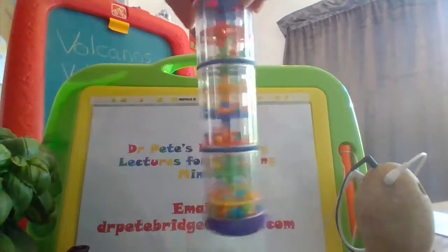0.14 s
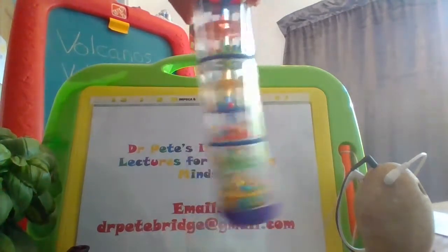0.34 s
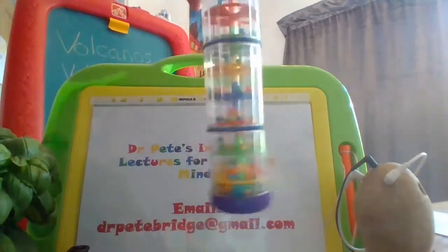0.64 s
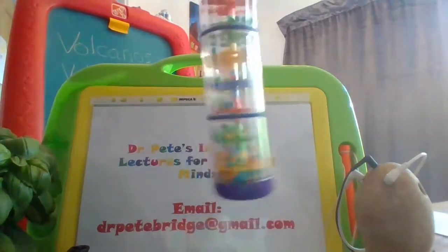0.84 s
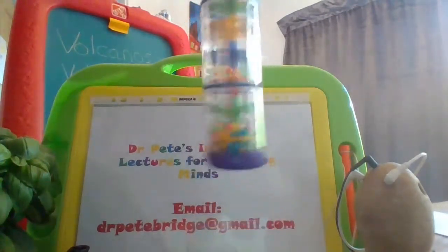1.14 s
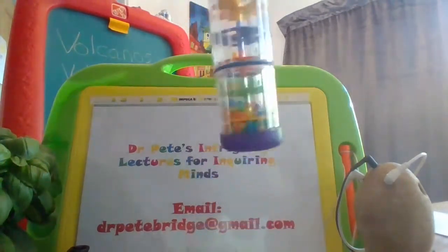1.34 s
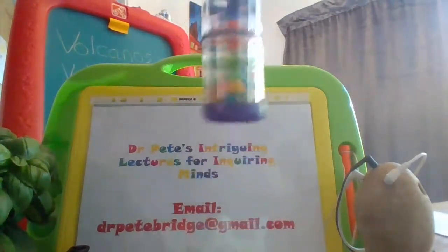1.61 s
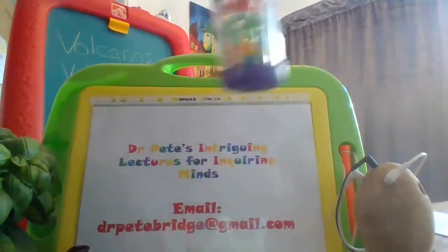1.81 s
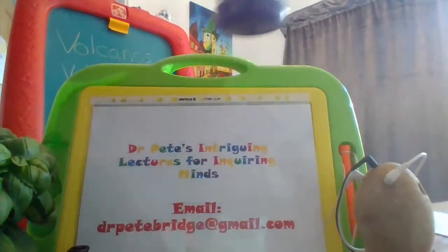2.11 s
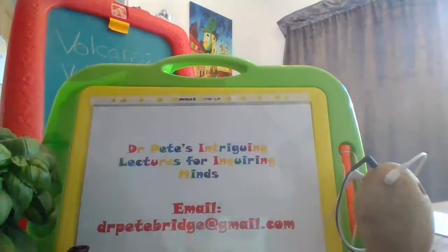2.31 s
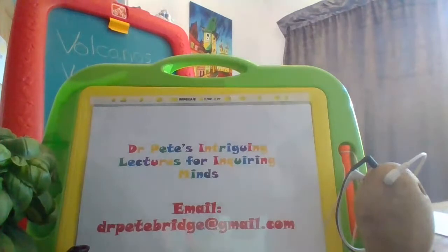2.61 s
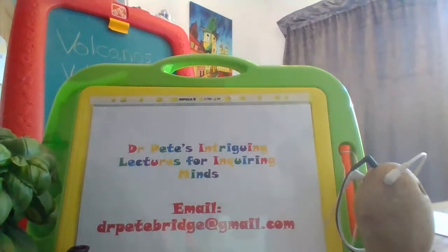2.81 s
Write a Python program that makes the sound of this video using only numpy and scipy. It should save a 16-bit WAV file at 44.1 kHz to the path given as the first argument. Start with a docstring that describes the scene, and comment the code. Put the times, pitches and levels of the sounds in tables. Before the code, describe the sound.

Small hard beads trickle through a plastic rainmaker tube, a bright, dense, jittery hissing rattle

```python
"""Beads trickling in a tube

Small hard beads trickle over the baffles of a clear plastic tube in a quiet room. A hand jiggles it about
twelve times a second and slowly lifts it away from a mono microphone. Random ticks ring the modes of the tube,
dry clicks fill in between, and the hardest ticks are a crack plus one short pitch. A short room echo, faint
low noise and soft bumps lie underneath; a few times the sound drops out for some milliseconds, leaving hiss."""
import sys
import numpy as np
from scipy import signal
from scipy.fft import rfft, irfft, next_fast_len
from scipy.io import wavfile
from scipy.ndimage import uniform_filter1d, map_coordinates

SR = 44100
rng = np.random.default_rng(int(sys.argv[2]) if len(sys.argv) > 2 else 0)


def generate_wav(sig):
    """Save sig (samples, or channels by samples) to the path in sys.argv[1] as 16-bit PCM at SR."""
    pcm = np.round(np.clip(np.atleast_2d(sig).T, -1, 1) * 32767).astype(np.int16)
    wavfile.write(sys.argv[1], SR, pcm)


N = 130095
T = np.arange(N) / SR  # time of each sample in seconds


def amp(db):
    """Turn decibels into a plain multiplier."""
    return 10 ** (np.asarray(db) / 20)


def unit(x):
    """Scale a sound to an average (rms) level of 1."""
    return x / np.sqrt(np.mean(x ** 2) + 1e-20)


def filtered(x, response):
    """Multiply the spectrum of x by a response that depends on frequency."""
    padded = 2 * next_fast_len(N // 2 + 4096)  # spare room for the filter's ringing
    hz = np.fft.rfftfreq(padded, 1 / SR)
    return irfft(rfft(x, padded) * response(hz), padded)[..., :N]


def coloured(x, points):
    """Shape the tone by a curve of (pitch_hz, level_db) points; the filter rings only after its input."""
    point_hz, point_db = np.transpose(points)

    def response(hz):
        curve_db = np.interp(np.log(hz + 1), np.log(point_hz + 1), point_db)
        cepstrum = irfft(np.log(amp(curve_db)))
        k = np.arange(len(cepstrum))
        # Folding the second half onto the first gives the minimum-phase filter.
        fold = ((k > 0) + 1) * (k < len(cepstrum) / 2)
        return np.exp(rfft(cepstrum * fold))
    return filtered(x, response)


def resonant(x, hz, width_hz):
    """Pass x through one resonance, which leaves its centre pitch at full level."""
    return filtered(x, lambda f: 1j * f * width_hz / (hz * hz - f * f + 1j * f * width_hz))


def wobble(rate):
    """A smooth random curve through a given number of random points a second."""
    return map_coordinates(rng.standard_normal(400), [T * rate])


def bump(s, spread_s, rise=1):
    """A bell curve around a moment; rise below 1 makes it rise faster than it falls."""
    side_s = np.where(T < s, rise * spread_s, spread_s)
    return np.exp(-.5 * ((T - s) / side_s) ** 2)


def patchy(x, depth_db, top_hz):
    """Make the sound below about top_hz come and go in random patches of time and pitch."""
    hz, _, z = signal.stft(x, SR, nperseg=2048, noverlap=1536)
    field = uniform_filter1d(rng.standard_normal(z.shape), size=4, axis=0)
    field = unit(uniform_filter1d(field, size=4, axis=1))
    gain_db = depth_db * field / (1 + (hz[:, None] / top_hz) ** 6)
    return signal.istft(z * amp(gain_db), SR, nperseg=2048, noverlap=1536)[1][:N]


def impacts(rate, size_db):
    """Beads hit at random times, with random sizes and signs; the average (rms) level is 1."""
    when, size, sign = rng.random(N), rng.standard_normal(N), rng.standard_normal(N)
    hits = (when < rate / SR) * amp(size_db * np.clip(size, -3, 2.5)) * np.sign(sign)
    return unit(hits)


# Modes of the tube: pitch_hz, width_hz, near_db (before the lift), lifted_db (after it).
# The levels are relative, before the overall colouring.
TUBE_MODES = [(1265, 262, 3, 2), (2173, 256, 3.5, 1), (3180, 290, 2.5, -9.5), (4000, 250, -1, 4),
              (4360, 360, -0.5, 0.5), (4860, 470, -10, 5), (5750, 250, -10, 1), (6630, 370, 0, -0.5),
              (7200, 490, 1, 1), (9580, 130, -5, 2), (10450, 390, -2, -2), (11400, 220, -10, 3.5)]
# Jiggles of the hand: start_s (middle of the swell), swell_db, lowest_mode_db (extra swell of the lowest mode).
JIGGLES = [(.045, 1, 4), (0.123, 4, -3), (0.183, 4.5, -6), (0.213, 4, -9), (0.278, 5, -6.5),
           (.31, 2.5, 2.5), (0.365, 3, 0), (.44, 2, -5), (.466, 1, 1), (0.545, 5, -33), (0.622, 3, -5),
           (0.689, 2, -2.5), (0.769, 3.5, 2), (0.845, 4, -2), (0.889, 3.5, -6), (0.943, 5, -8),
           (1.02, 2.5, -15), (1.098, 1.5, -4), (1.182, 1.5, -15), (1.272, 0.5, -5), (1.337, 1, 0),
           (1.427, 2.5, 4), (1.499, 2.5, -11), (1.583, 4.5, -17), (1.656, 3, 3), (1.736, 2, 3),
           (1.801, 2, 2), (1.91, 1.5, 4.5), (1.98, 0, 5.5), (2.055, 1.5, 1.5), (2.135, 1.5, -10.5),
           (2.105, -1.5, 17.5), (2.2, 1, 6), (2.26, 0, 11), (2.38, 1.5, 8), (2.454, 2, 0), (2.534, 0, 5),
           (2.62, -0.5, -11), (2.699, 1.5, 2), (2.783, 3, -13), (2.855, 1.5, 6)]
# Overall colour before the lift: pitch_hz, level_db (per Hz).
NEAR_COLOUR = [(240, -66.5), (400, -33), (700, -18.5), (1050, -10.5), (1270, -3), (1770, -10), (2270, -5.5),
               (3280, -6.5), (3590, -7), (4260, -2), (5040, -5), (6750, -2.5), (7990, -6.5), (10400, -1),
               (15700, -4.5)]
# Overall colour after the lift: pitch_hz, level_db (per Hz).
LIFTED_COLOUR = [(240, -69), (400, -61), (739, -22.5), (1250, -9.5), (1830, -17.5), (2300, -1),
                 (3180, -3.5), (3380, -4), (4670, -3.5), (5280, -4.5), (6640, -1), (7870, -5),
                 (10700, -2.5), (15700, -6.5)]
# Gain of the gap between the two lowest modes, showing how hollow it sounds: time_s, gain_db.
HOLLOW = [(0, -2), (.8, -1), (1.3, 1.5), (1.43, -7), (1.51, 4), (1.58, -1), (1.65, 2.5), (2.2, -2.5),
          (2.53, 2.5), (2.6, -5), (2.66, 2), (2.71, 5), (2.9, -1)]
# Strength of the trickle before the swells and a final trim: time_s, level_db.
FLOW = [(0.0, -48.5), (0.024, -43.5), (0.031, -32), (0.045, -34), (0.09, -32.5), (0.11, -29.5),
        (0.48, -23.5), (0.51, -26), (0.55, -26.5), (0.6, -26), (0.62, -26), (1.16, -28.5), (2.07, -29.5),
        (2.25, -33.5), (2.88, -32), (2.95, -35.5)]
LIFT_START_S, LIFT_END_S = 0.56, 2.43
CLICKS_PER_S, CLICK_SIZE_DB, CLICK_DB = 12000, 3.5, -1  # dry bead-on-bead clicks: rate, size scatter, level
TICKS_PER_S, TICK_SIZE_DB = 500, 4  # ticks on each pitch, size scatter
DETUNE = 0.014  # baffles differ: each mode sounds at two pitches, this share below and above its centre
DRIFT_DB, DRIFT_PER_S = 1.8, 25  # random wander in level of each pitch
CLUMP_DB, CLUMPS_PER_S = .8, 130  # beads arrive in small clumps
JIGGLE_S, RISE_SHARE = 0.015, 0.89  # spread of a swell as it falls, its rise over its fall
HOLLOW_HZ, HOLLOW_WIDTH_HZ = 1820, 520


def beads():
    """Ticks ring the modes, clicks stay dry; jiggles swell them and the lift changes their colour."""
    lift = np.clip((T - LIFT_START_S) / (LIFT_END_S - LIFT_START_S), 0, 1)
    lowest_mode_db = sum(db * bump(s, 1.43 * JIGGLE_S) for s, _, db in JIGGLES)
    x = amp(CLICK_DB) * impacts(CLICKS_PER_S, CLICK_SIZE_DB)
    for k, (hz, width_hz, near_db, lifted_db) in enumerate(TUBE_MODES):
        for side in (-1, 1):
            gain_db = near_db + lift * (lifted_db - near_db) + DRIFT_DB * wobble(DRIFT_PER_S)
            if k == 0:
                gain_db = gain_db + lowest_mode_db
            ticks = amp(gain_db) * impacts(TICKS_PER_S, TICK_SIZE_DB) / np.sqrt(2)
            x = x + resonant(ticks, hz * (1 + side * DETUNE), width_hz)

    # Fade from the near colour to the lifted one.
    x = (1 - lift) * unit(coloured(x, NEAR_COLOUR)) + lift * unit(coloured(x, LIFTED_COLOUR))
    hollow_gain = amp(np.interp(T, *np.transpose(HOLLOW)))
    x = x + (hollow_gain - 1) * resonant(x, HOLLOW_HZ, HOLLOW_WIDTH_HZ)

    jiggle_db = sum(db * bump(s, JIGGLE_S, rise=RISE_SHARE) for s, db, _ in JIGGLES)
    swell_db = CLUMP_DB * wobble(CLUMPS_PER_S) + jiggle_db
    flow_db = np.interp(T, *np.transpose(FLOW))
    return x * amp(flow_db + swell_db - 2.0)  # trimmed by 2 dB


# The hardest ticks, each ringing clear of the rattle: start_s, pitch_hz, level_db (start of the ring, uncoloured).
HARD_TICKS = [(.028, 1280, -39), (.117, 10780, -23), (.127, 4310, -25), (.178, 7400, -20),
              (.184, 7240, -17), (.212, 10470, -17), (.226, 7040, -22), (.279, 6500, -32),
              (.297, 10300, -21), (.363, 6840, -19), (0.371, 6800, -20), (.393, 4320, -28),
              (.449, 4130, -18), (.464, 10470, -21), (0.537, 6760, -24), (.549, 10700, -24),
              (.559, 3160, -18.5), (.625, 6770, -21), (.769, 3970, -22), (.77, 10610, -21),
              (.848, 4420, -19), (.888, 6840, -24), (.937, 10400, -19), (0.943, 10470, -17),
              (1.182, 6750, -24), (1.257, 10460, -22.5), (1.324, 7050, -21), (1.587, 4640, -24),
              (1.669, 4400, -22), (1.886, 6830, -23), (1.91, 4500, -19), (2.134, 11510, -25),
              (2.261, 5000, -31), (2.335, 5400, -27), (2.684, 2200, -24), (2.692, 2300, -31),
              (2.887, 2400, -29.5), (2.908, 4970, -28)]
RING_T60_S, CRACK_T60_S, CRACK_DB = 0.013, 0.0022, -10  # times to fall 60 dB, crack level against the ring


def hard_ticks():
    """A hard hit gives a short noisy crack and one pitch that dies fast."""
    out, t = np.zeros(N + SR), T[:SR // 20]
    for s, hz, db in HARD_TICKS:
        crack = amp(CRACK_DB - 60 * t / CRACK_T60_S) * rng.standard_normal(len(t))
        ring = amp(-60 * t / RING_T60_S) * np.sin(2 * np.pi * hz * t)
        out[round(s * SR):][:len(t)] += amp(db) * (ring + crack)
    # Thin out the lows.
    return coloured(out[:N], [(240, -66), (400, -30), (1100, -4.5), (16000, -0.5)])


ROOM_T60_S, ROOM_DB = 0.081, -5.5  # time for the echo to fall 60 dB, its level


def room(x):
    """A short diffuse echo of fading noise, blended into a new one every eighth of a second as the tube moves."""
    step, t = SR // 8, T[:SR // 3]
    wet, fade = np.zeros(N + 2 * SR), np.hanning(2 * step)
    x = np.pad(x, (step, 2 * step))
    for at in range(0, N + step, step):
        tail = rng.standard_normal(len(t)) * amp(-60 * t / ROOM_T60_S)
        part = signal.fftconvolve(fade * x[at:at + 2 * step], tail / np.linalg.norm(tail))
        wet[at:at + len(part)] += part
    return wet[step:step + N]


# Colour of the low room noise: pitch_hz, level_db (per Hz).
FLOOR_COLOUR = [(15, -50), (25, -27), (53, -11), (81, 2), (249, -1.5), (339, -3.5), (600, -9.5), (780, -49),
                (1320, -120)]
# Soft low bumps: start_s (middle of the bump), level_db (peak of its bell curve).
THUDS = [(.4, -72), (.66, -72), (1.82, -74), (2.48, -77), (2.55, -62), (2.64, -69)]
FLOOR_DB = -79  # level of the room noise before its patches
THUD_HZ, THUD_S = 137, 0.014  # pitch and spread of a bump
FLOOR_PATCH_DB, SKIRT_PATCH_DB, SKIRT_HZ = 4.5, 4.5, 990  # patches in the room noise and in the beads' faint lows


def background():
    """Faint low noise shaped from random hiss, and soft bumps made from a briefly swelling low tone."""
    noise = unit(coloured(rng.standard_normal(N), FLOOR_COLOUR))
    noise = amp(FLOOR_DB) * patchy(noise, FLOOR_PATCH_DB, SKIRT_HZ)
    thud_level = sum(amp(db) * bump(s, THUD_S) for s, db in THUDS)
    return noise + thud_level * np.sin(2 * np.pi * THUD_HZ * T)


def scene():
    """Beads and hard ticks with their room echo, over the background; both channels are the same."""
    x = beads() + hard_ticks()
    x = x + amp(ROOM_DB) * room(x)
    x = patchy(x, SKIRT_PATCH_DB, SKIRT_HZ) + background()
    return np.array([x, x])


# Dropouts: centre_s, half_length_s, depth_db, hiss_db (level of the flat hiss that fills them).
DROPOUTS = [(0.51, 0.012, -9, -40.5), (0.593, 0.0094, -8.5, -47.5), (2.286, 0.0096, -10, -46),
            (2.945, 0.013, -3.5, -49.5)]
# Colour of that hiss: pitch_hz, level_db (per Hz).
HISS_COLOUR = [(30, -7), (100, -7.5), (200, -2), (480, 0), (700, -1.5), (2000, 2.5), (15000, -4)]
TOP_HZ = 15720  # almost nothing passes above this


def record(dry):
    """Turn the sound down in brief dropouts filled with flat hiss, then cut off the highest treble."""
    dips = [np.exp(-((T - s) / half_s) ** 4) for s, half_s, *_ in DROPOUTS]
    gain = amp(sum(dip * row[2] for dip, row in zip(dips, DROPOUTS)))
    hiss_level = sum(dip * amp(row[3]) for dip, row in zip(dips, DROPOUTS))
    hiss = hiss_level * unit(coloured(rng.standard_normal(N), HISS_COLOUR))
    return filtered(dry * gain + hiss, lambda hz: 1 / (1 + (hz / TOP_HZ) ** 900))


dry = scene()
out = record(dry)
generate_wav(out)
```